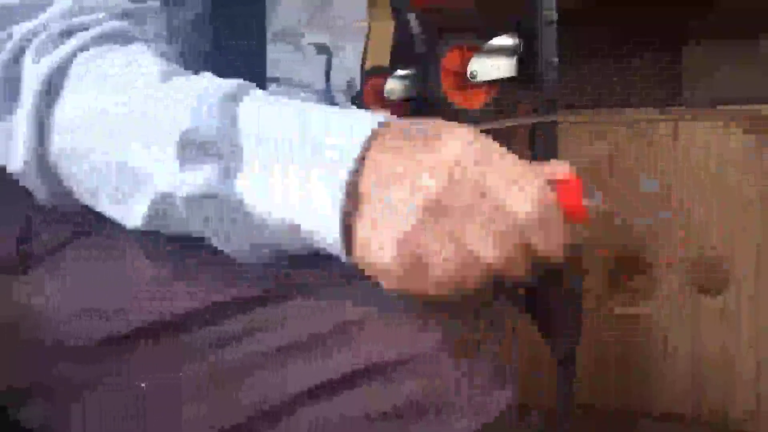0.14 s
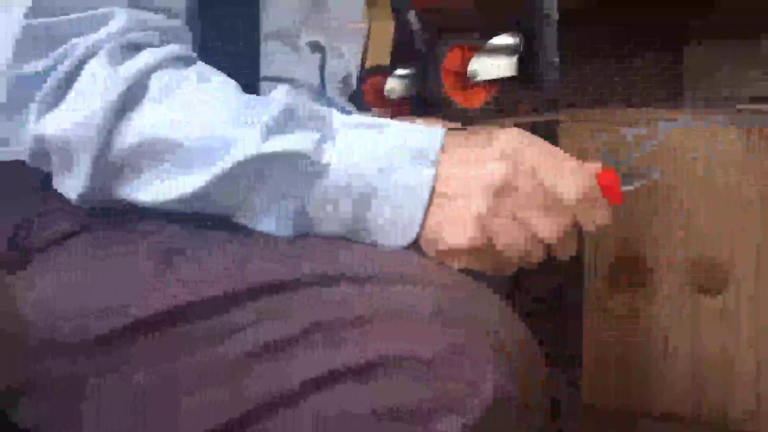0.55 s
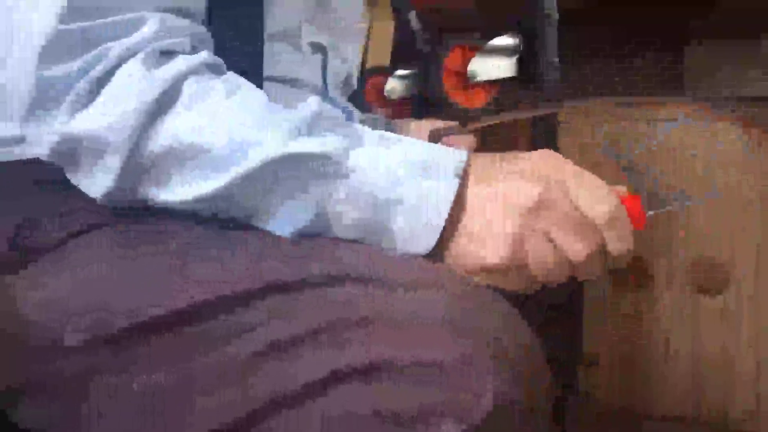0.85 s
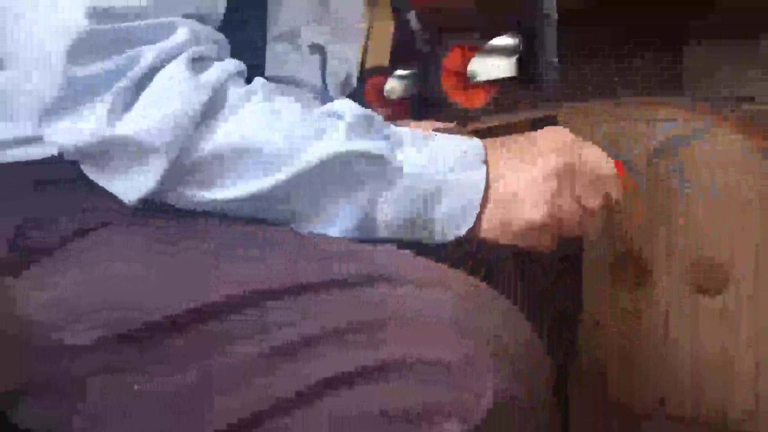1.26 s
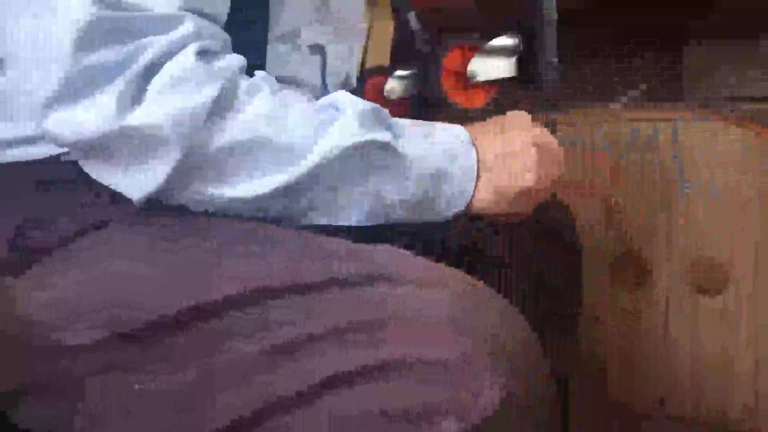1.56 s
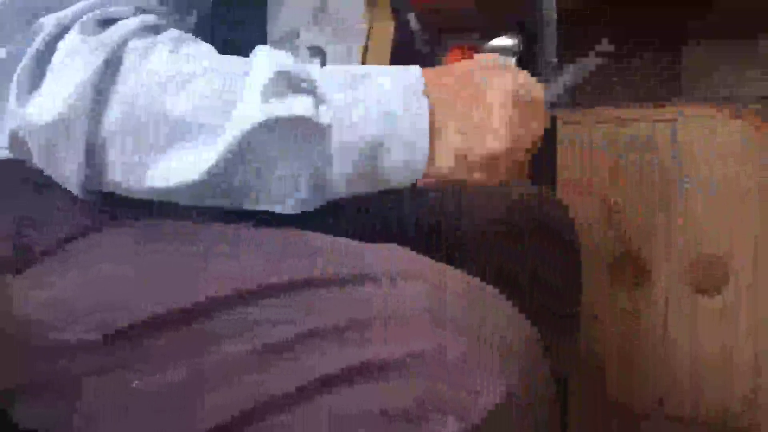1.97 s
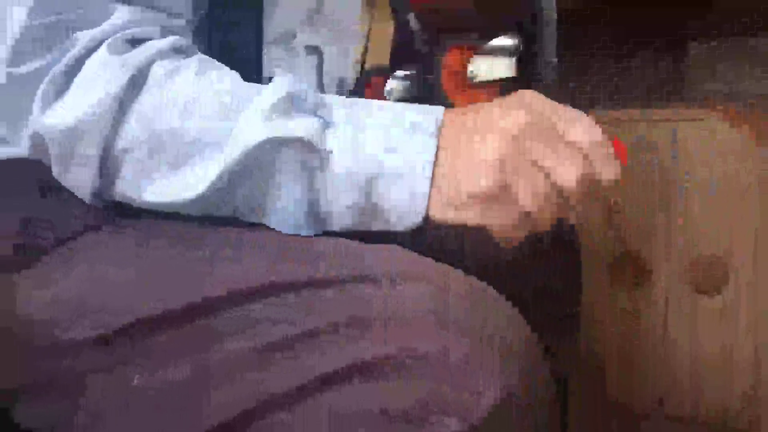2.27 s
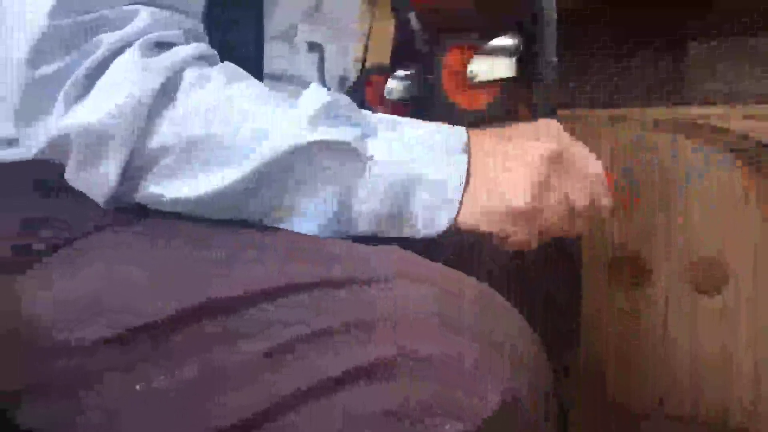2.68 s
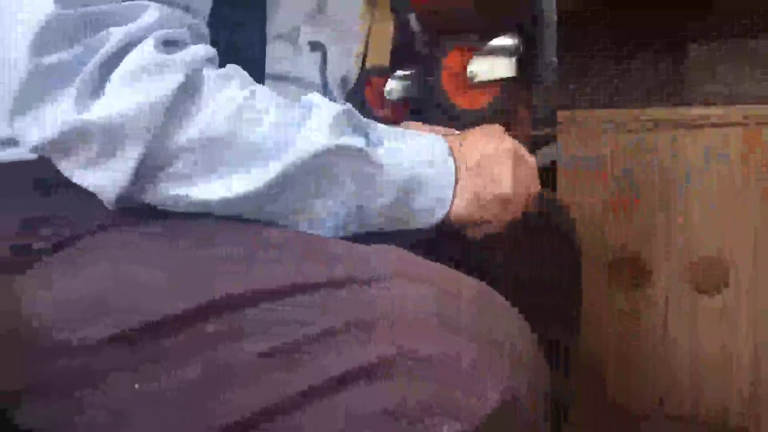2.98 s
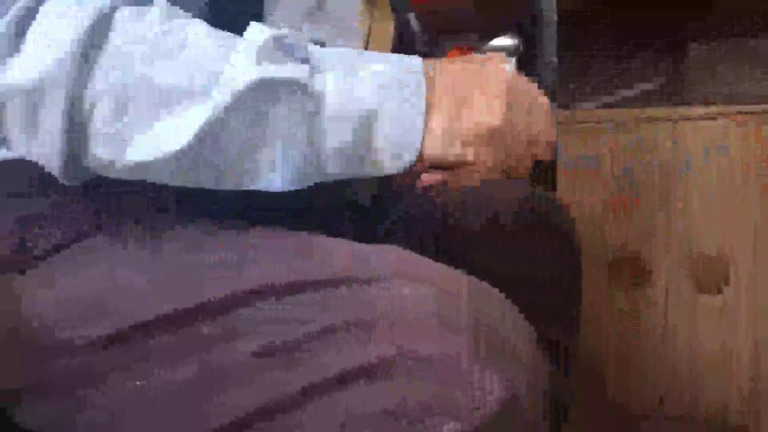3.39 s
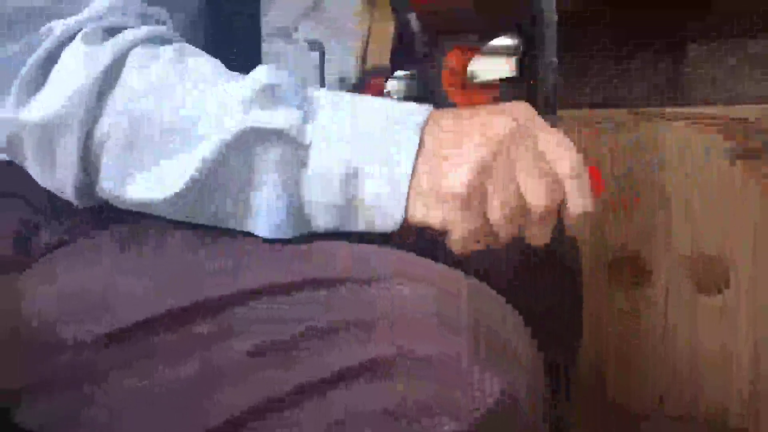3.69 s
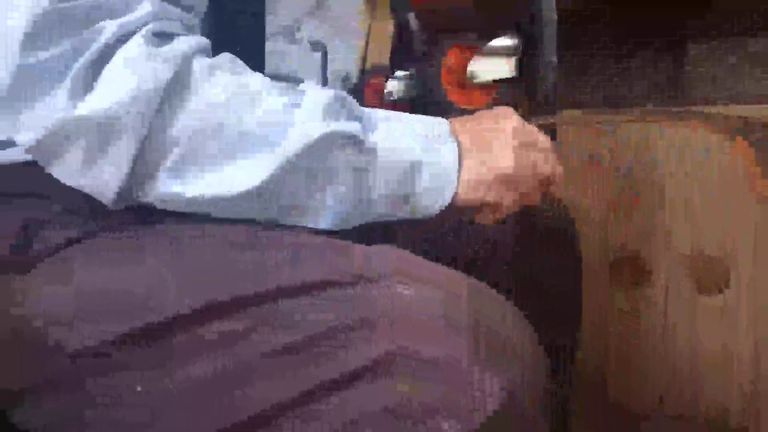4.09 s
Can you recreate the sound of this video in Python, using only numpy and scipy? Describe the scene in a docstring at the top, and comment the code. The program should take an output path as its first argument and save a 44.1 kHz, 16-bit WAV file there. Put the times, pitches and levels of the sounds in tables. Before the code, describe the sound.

Gritty, high-pitched filing on thin steel: brief rasps of uneven length, broken by hard clacks with short ringing, close up indoors.

```python
"""A short rasp and a burst of clinks, then more strokes of a diamond file along a steel sickle in a small room.
Random grit impacts drive coloured noise bands, the bending modes of the blade and a gliding file note.
Contacts give a noise clack, ringing steel modes and a wooden thud; hollow knocks and one faint brush join.
Moving echoes surround these; a low fluttering hum, rumble, hiss and a faint whir lie underneath."""
import sys
import numpy as np
from scipy import signal
from scipy.fft import rfft, irfft
from scipy.io import wavfile

SR = 44100
rng = np.random.default_rng(int(sys.argv[2]) if len(sys.argv) > 2 else 0)


def file_out(sig):
    """Save sig as 16-bit WAV at sys.argv[1]."""
    # one column per channel
    cols = np.atleast_2d(sig).T
    # limit, then scale
    lim = np.clip(cols, -1, 1)
    pcm = np.round(lim * 32767).astype(np.int16)
    wavfile.write(sys.argv[1], SR, pcm)


N = 187224
T = np.arange(N) / SR

# All table levels are relative; the functions add their own trims.
# Pushes of the file: start t/s, hardest t/s, end t/s, rasp level at hardest/dB,
# pressure loss at start/dB, pressure loss at end/dB,
# body, fizz, grind, file note re rasp/dB (4 columns), note at start f/Hz, note at end f/Hz
STROKES = [(0.0, 0.033, 0.048, -25.5, 0.35, 1.5, -12.5, -13, -22.5, -13.5, 1650, 2300),
           (0.923, 0.988, 1.295, -37.5, 8.6, 3, -11, -17, -22, -24, 1766, 1293),
           (1.3, 1.425, 1.7, -40, 0.48, 7.5, -13, -9.5, -26, -27, 2216, 2372),
           (1.723, 1.758, 1.796, -32, 3.5, 1.5, -10.5, -4, -32, -17, 2395, 2660),
           (2.51, 2.654, 2.838, -37, 13.3, 1, -10, -17, -22.5, -22, 2170, 2107),
           (2.836, 2.894, 3.077, -33.5, 1.7, 12.5, -10, -15.5, -21, -31.5, 1139, 1487),
           (3.105, 3.148, 3.297, -39, 2, 6, -5, -6, -16.5, -14.5, 2030, 2080),
           (3.864, 3.9, 4.249, -35, 4.1, 0, -10.5, -15, -24, -14.5, 2064, 2100)]
# Level gained per dB of pressure by rasp, body, fizz, grind: slope/(dB/dB)
PRESSURE_SLOPES = [1.175, 0.95, 1.3, .55]
# Grit catching on the edge: t/s, level change/dB, length/s
SNAGS = [(0.965, 4, 0.025), (1.03, 5, 0.0084), (1.134, 4, 0.018), (1.227, 6.5, 0.023), (1.579, 9.5, 0.021),
         (1.626, 10.5, 0.011), (2.673, 4.5, 0.012), (2.746, 6, 0.0088), (2.85, -1.5, 0.0043),
         (2.93, 6, 0.006), (2.987, 8.5, 0.0083), (3.257, 7.5, 0.0058), (3.98, 2, 0.0076), (4.19, 3, 0.0047)]
# Spectra of grit on steel: f/Hz, density level/dB
RASP_SPECTRUM = [(2500, -40.5), (3300, -18.5), (4000, -5.5), (4550, -1), (4950, -9), (5700, 0), (6600, 2),
                 (7200, 3), (7750, -13), (8200, -16), (9200, -35.5)]
BODY_SPECTRUM = [(900, -43), (1450, -9), (1750, -5.5), (2050, 1), (2400, 3.5), (2900, 7.5), (3300, 7.5),
                 (4200, -25.5)]
FIZZ_SPECTRUM = [(7500, -26.5), (8300, 1), (9000, 4.5), (10200, 5.5), (12000, 0), (13000, -2), (13900, 8),
                 (15000, -32.5), (16000, -1.5)]
GRIND_SPECTRUM = [(200, -23), (400, -17.5), (750, -3), (1100, -3), (1450, 6.5), (1700, -5), (2100, -21)]
# Bending modes of the sickle: f/Hz, rubbed level/dB, struck level/dB, t60/s before the clink's factor
BLADE_MODES = [(2100, -23.5, -28, .12), (2366, -13, -20.5, 0.18), (2848, -9, -12.5, 0.12),
               (3075, -21, -6, 0.089), (3530, -23.5, -12, 0.098), (3960, -11.5, -18, .17),
               (4150, -12.5, -14.5, .16), (4575, -1.5, -7, 0.16), (5220, -4.5, -7.5, 0.11),
               (5224, -10, -14.5, 0.11), (5833, -0.5, -2.5, 0.11), (6160, 1, -9.5, .13),
               (6420, 6.5, -13.5, 0.14), (6599, 3, 2.5, 0.13), (6820, -2.5, -15, .1),
               (7180, -2.5, -19.5, .13), (7520, 5.5, -4, 0.16), (7650, -1.5, -9.5, 0.1),
               (8530, -20, -22, 0.12), (9340, -14, -30, 0.14), (11350, -26, -22, .15),
               (14600, -25, -27, .08)]
# File meets or leaves the blade: t/s, clack level/dB, ring level/dB, favoured f/Hz,
# wooden thud level/dB, chatter time/s, ring-time factor/1
CLINKS = [(0.0398, -11, -20.5, 6560, -47.5, 0.00067, 0.75), (0.0581, -25, -11, 4600, -54.5, 0.0014, 0.76),
          (.066, -27, -10, 7550, -50, 0.0011, 1.27), (0.1527, -37.5, -47, 4000, -66, 0.00039, 1.6),
          (0.2564, -47, -50, 4000, -50, 0.0007, 0.72), (0.7316, -18, -15.5, 4300, -29.5, 0.011, 0.4),
          (1.707, -34, -13, 6600, -73, 0.0025, .6), (1.755, -40, -5.5, 6700, -58.5, 0.0075, 0.86),
          (1.788, -19, -13.5, 5200, -55.5, 0.013, 1.52), (2.416, -7.5, -4.5, 5820, -21.5, 0.0082, 0.94),
          (3.301, -32, -25.5, 5100, -43.5, 0.004, 1.3), (3.706, -4.5, -8.5, 7070, -24.5, 0.0076, 1.13)]
# Clack spectrum: f/Hz, density level/dB
CLACK_SPECTRUM = [(300, -23.5), (700, -14), (1100, -12.5), (1900, -7.5), (2900, -3), (4200, -6),
                  (6000, 4.5), (7600, -10.5), (8600, -20), (11500, -16), (14000, -20), (16000, -30.5)]
# Dull modes of handle and bench: f/Hz, level/dB, t60/s
WOOD_MODES = [(309.8, -5.5, 0.038), (368.5, 0, 0.062), (418, 3.5, 0.084), (465, 3, 0.12), (596, -4, 0.11),
              (681, -2, 0.13), (770, -5, 0.025), (950, -5.5, 0.051), (1500, -2.5, 0.096)]
# Hollow knocks of the wood under the blade: t/s, level/dB, f/Hz, t60/s, rise/s
KNOCKS = [(0.738, -32.5, 238, 0.061, 0.0036), (0.742, -35, 159, 0.036, 0.0036),
          (3.115, -23, 483, 0.072, .02)]
# Faint brush as the hand draws back: t/s, level/dB, length/s
RUSTLE = (0.43, -79.5, 0.056)
# Echo decay: f/Hz, t60/s
ROOM_T60 = [(200, 0.14), (530, 0.2), (1400, 0.13), (3700, 0.097), (9700, 0.12), (15000, 0.097)]
# Hum contour: t/s, level/dB
HUM_CONTOUR = [(0, -72.5), (0.6, -73), (1.1, -70), (1.5, -70.5), (3.5, -72), (3.9, -64)]
# Background spectra: f/Hz, density level/dB
RUMBLE_SPECTRUM = [(20, -19.5), (40, -16.5), (62, -1), (100, -0.5), (130, -15), (200, -41)]
HISS_SPECTRUM = [(65, -33.5), (110, 1), (156, -5), (232, -4), (336, -3), (613, -13), (770, -2),
                 (1560, -19.5), (1800, -2), (2120, -20.5), (2260, -15), (3210, -20), (7060, -24),
                 (9830, -42.5), (15500, -32.5)]


def filing(rasp_db=-3, blade_db=-4, body_db=-2, grind_db=-3, fizz_db=-4,
           damped_width_hz=45, wander_ratio=0.0023, file_width_hz=110):
    """Grit drives the blade and the file; the moving contact damps and detunes the blade modes."""
    grains = shifting(grit(), depth_db=2.7)
    (rasp_gain, body_gain, fizz_gain, grind_gain, note_gain), note_hz = stroking()

    blade = np.zeros(N)
    for hz, rubbed_db, _, _ in BLADE_MODES:
        wandering_hz = hz * (1 + wander_ratio * drift(12))
        blade += amp(rubbed_db) * evened(resonate(grains, wandering_hz, damped_width_hz))
    blade = evened(colour(blade, [(700, -34.5), (2000, 2), (16000, 3)]))

    note_hz = note_hz * (1 + 0.012 * drift(25))
    file_note = resonate(grains, note_hz, file_width_hz)
    file_note = evened(resonate(file_note, note_hz, 2 * file_width_hz))

    rasp = evened(colour(grains, RASP_SPECTRUM))
    body = evened(colour(grains, BODY_SPECTRUM))
    grind = evened(colour(grains, GRIND_SPECTRUM))
    fizz = evened(colour(grains, FIZZ_SPECTRUM))
    return (rasp_gain * (amp(rasp_db) * rasp + amp(blade_db) * blade)
            + note_gain * file_note
            + body_gain * amp(body_db) * body
            + grind_gain * amp(grind_db) * grind
            + fizz_gain * amp(fizz_db) * fizz)


def stroking(attack_s=0.032, bite_db=30.5, release_db_per_s=452.5):
    """Pushes bite, press harder, ease and lift off; snags shift the level. Returns five gains and note Hz."""
    gains, note_hz = np.zeros((5, N)), np.zeros(N)
    for (start, hardest, end, rasp_db, start_db, end_db,
         body_db, fizz_db, grind_db, note_db, from_hz, to_hz) in STROKES:
        pressure_db = -np.interp(T, [start, hardest, end], [start_db, 0, end_db])
        early_s, late_s = np.maximum(start - T, 0), np.maximum(T - end, 0)
        touch = amp(-bite_db * (early_s / attack_s) ** 2 - release_db_per_s * late_s)
        shares_db = [0, body_db, fizz_db, grind_db, note_db]
        for gain, share_db, slope in zip(gains, shares_db, [*PRESSURE_SLOPES, 1]):
            gain += touch * amp(rasp_db + share_db + slope * pressure_db)
        glide_hz = np.interp(T, [start, end], [from_hz, to_hz])
        note_hz = np.where(early_s < attack_s, glide_hz, note_hz)
    snag_db = sum(db * np.exp(-((T - s) / length_s) ** 2) for s, db, length_s in SNAGS)
    return gains * amp(snag_db), note_hz


def grit(rate_per_s=11000, spread_db=2, judder_db=1.8, judder_hz=220):
    """Diamond grains strike the edge, a few of them hard, in clumps as the file judders."""
    strength = amp(spread_db * np.minimum(rng.exponential(1, N), 5))
    polarity = rng.choice([-1, 1], N)
    hits = rng.random(N) < rate_per_s / SR
    return evened(strength * polarity * hits * amp(judder_db * drift(judder_hz)))


def shifting(x, depth_db, width_hz=75, hold_s=0.0093):
    """The travelling contact favours changing overtones: smooth random time-frequency gain patches."""
    hz, t, z = signal.stft(x, SR, nperseg=1024, noverlap=768)
    across = np.fft.fftfreq(len(hz), hz[1])[:, None]
    along = np.fft.fftfreq(len(t), t[1])
    blur = np.exp(-2 * np.pi ** 2 * ((across * width_hz) ** 2 + (along * hold_s) ** 2))
    patches = evened(np.fft.ifft2(np.fft.fft2(rng.standard_normal(z.shape)) * blur).real)
    shifted = signal.istft(z * amp(depth_db * patches), SR, nperseg=1024, noverlap=768)[1]
    return evened(shifted[:N])


def clinks(favour_db=8, favour_width_hz=500, steel_rise_s=0.0016, wood_rise_s=0.004,
           clack_trim_db=5, ring_trim_db=3):
    """The file chatters on contact; steel modes ring for a time set by each contact; the wood answers."""
    out, t = np.zeros(N), np.arange(SR // 3) / SR
    hz, _, struck_db, t60_s = np.transpose(BLADE_MODES)
    for s, clack_db, ring_db, spot_hz, thud_db, chatter_s, ring_factor in CLINKS:
        chatter = rng.standard_normal(len(t)) * np.sqrt(t) * np.exp(-t / chatter_s)
        clack = unit(colour(chatter, CLACK_SPECTRUM))
        # contact spot favours modes near its pitch and the octave below
        near = (np.exp(-((hz - spot_hz) / favour_width_hz) ** 2)
                + np.exp(-((hz - spot_hz / 2) / favour_width_hz) ** 2))
        steel = ring(zip(hz, struck_db + favour_db * near, t60_s * ring_factor), t, steel_rise_s)
        thud = ring(WOOD_MODES, t, wood_rise_s)
        ringing = amp(ring_db) * steel + amp(thud_db) * thud
        add(out, s, amp(clack_db + clack_trim_db) * clack + amp(ring_trim_db) * ringing)
    return out


def knocks():
    """Brief hollow notes from the wood, one decaying mode each."""
    out, t = np.zeros(N), np.arange(SR // 3) / SR
    for s, db, hz, t60_s, rise_s in KNOCKS:
        add(out, s, amp(db) * ring([(hz, 0, t60_s)], t, rise_s))
    return out


def rustle():
    """A soft, high brush between two strokes: coloured noise under a Gaussian swell."""
    s, db, length_s = RUSTLE
    swell = np.exp(-((T - s) / length_s) ** 2)
    brush = colour(rng.standard_normal(N), [(1500, -17), (4000, -4), (7200, 0.5), (8500, -16)])
    return amp(db) * swell * evened(brush)


def room(x, wet_db=-2, count=7, step_s=0.06):
    """Direct sound plus echoes whose pattern changes as hand and blade move."""
    place = T / step_s
    wet = np.zeros(N)
    for k in range(count):
        away = abs((place - k + count / 2) % count - count / 2)
        fade = np.cos(np.pi / 2 * np.minimum(away, 1))
        wet += signal.oaconvolve(x * fade, reflections())[:N]
    return (x + amp(wet_db) * wet) / np.hypot(1, amp(wet_db))


def reflections(gap_s=0.0018, rate_per_s=4000):
    """Dense echoes from near walls, energy 1, each band dying at its own speed."""
    taps = rng.standard_normal(SR // 2) * (rng.random(SR // 2) < rate_per_s / SR)
    hz, t, z = signal.stft(taps, SR, nperseg=256)
    decay = np.exp(-np.log(1000) * t / read(ROOM_T60, hz)[:, None])
    tail = signal.istft(z * decay, SR)[1]
    return unit(tail * (np.arange(len(tail)) > gap_s * SR))


def background(hum_hz=85, hum_trim_db=-1, flutter_db=5.5, rumble_db=-77, hiss_db=-73, whir_db=-83):
    """A phase-wandering sine hum swells and sags over coloured-noise rumble and hiss, with a resonant whir."""
    hum_level_db = np.interp(T, *np.transpose(HUM_CONTOUR)) + hum_trim_db
    hum = amp(hum_level_db) * evened(np.sin(2 * np.pi * hum_hz * T + 0.89 * drift(10)))
    flutter = amp(flutter_db * np.minimum(drift(12), 1.8))
    rumble_noise, hiss_noise, whir_noise = rng.standard_normal((3, N))
    rumble = evened(colour(rumble_noise, RUMBLE_SPECTRUM, size=8192))
    hiss = evened(colour(hiss_noise, HISS_SPECTRUM))
    whir = np.zeros(N)
    for hz, width_hz in [(790, 290), (1890, 140)]:
        whir += evened(resonate(resonate(whir_noise, hz, width_hz), hz, width_hz))
    return (hum * flutter + amp(rumble_db) * rumble
            + amp(hiss_db) * hiss + amp(whir_db) * evened(whir))


def ring(modes, t, rise_s):
    """Random-phase sines swell briefly and die, energy 1; modes are f/Hz, level/dB, t60/s."""
    waves = np.zeros(len(t))
    for hz, db, t60_s in modes:
        decay = np.exp(-np.log(1000) * t / t60_s)
        waves += amp(db) * decay * np.sin(2 * np.pi * (hz * t + rng.random()))
    return unit(waves * (1 - np.exp(-t / rise_s)))


def resonate(x, hz, width_hz):
    """A resonance following hz: shift down to 0 Hz, one-pole lowpass, shift back up."""
    turn = np.exp(2j * np.pi * np.cumsum(hz * np.ones(N)) / SR)
    pole = np.exp(-np.pi * width_hz / SR)
    return (turn * signal.lfilter([1 - pole], [1, -pole], x / turn)).real


def colour(x, points, size=2048):
    """Minimum-phase filter with the given spectrum, floored at -100 dB."""
    level_db = np.maximum(read(points, abs(np.fft.fftfreq(size, 1 / SR))), -100)
    log_gain = np.log(amp(level_db))
    taps = np.fft.ifft(np.exp(np.conj(signal.hilbert(log_gain)))).real
    return signal.oaconvolve(x, taps[:size // 2])[:len(x)]


def drift(rate_hz):
    """Smooth random curve of rms 1: noise under a Gaussian lowpass."""
    f = np.fft.rfftfreq(N, 1 / SR)
    return evened(irfft(rfft(rng.standard_normal(N)) * np.exp(-(f / rate_hz) ** 2), N))


def read(points, hz):
    """Interpolates a table on a log-frequency axis."""
    f, value = np.transpose(points)
    return np.interp(np.log(hz + 1), np.log(f + 1), value)


def amp(db):
    """Decibels to gain."""
    return 10 ** (np.asarray(db) / 20)


def evened(x):
    """Scales to rms 1."""
    return x / np.sqrt(np.mean(x ** 2) + 1e-20)


def unit(x):
    """Scales to energy 1."""
    return x / np.linalg.norm(x)


def add(mix, s, sound):
    """Mixes a sound in at time s, cut at the end of the mix."""
    part = mix[max(round(s * SR), 0):][:len(sound)]
    part += sound[:len(part)]


def scene():
    """Strokes, clinks, knocks and brush in the room, over the background."""
    foreground = filing() + clinks() + knocks() + rustle()
    return (room(foreground) + background())[None]


def record(dry, edge_hz=15720):
    """The recorder's band limit: a linear-phase lowpass."""
    taps = signal.firwin(701, edge_hz, window=("kaiser", 9), fs=SR)
    return signal.oaconvolve(dry, taps[None], "same")


dry = scene()
out = record(dry)
file_out(out)
```